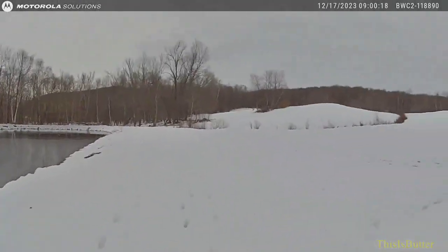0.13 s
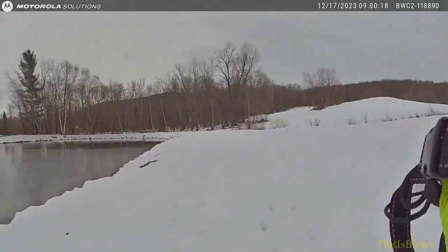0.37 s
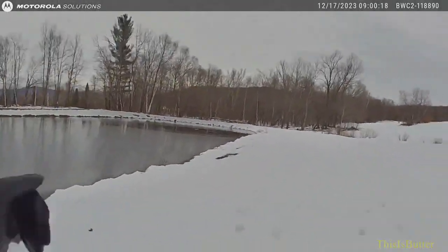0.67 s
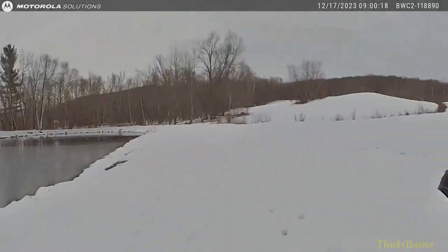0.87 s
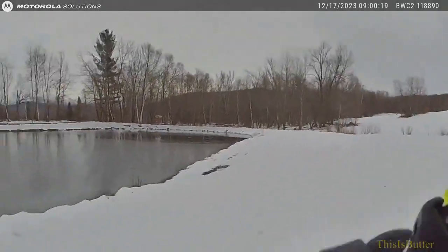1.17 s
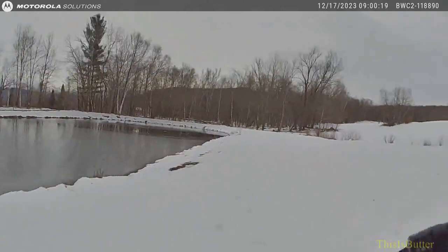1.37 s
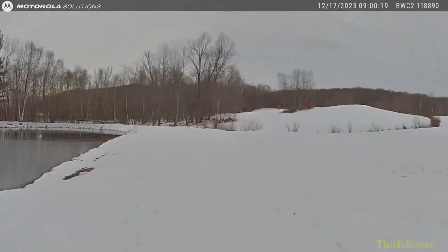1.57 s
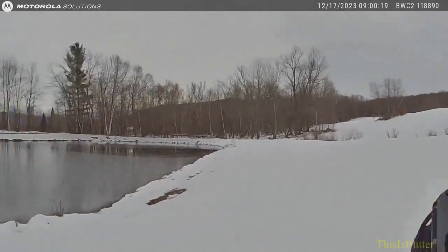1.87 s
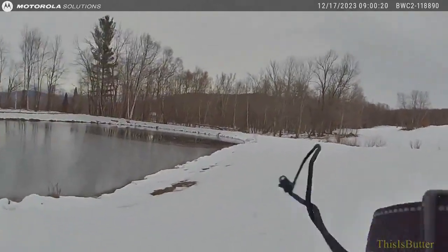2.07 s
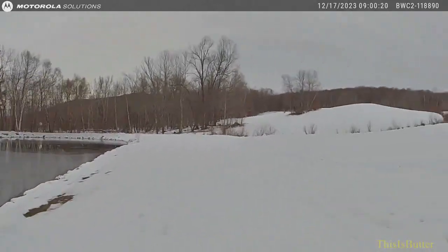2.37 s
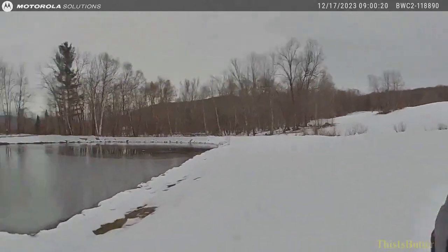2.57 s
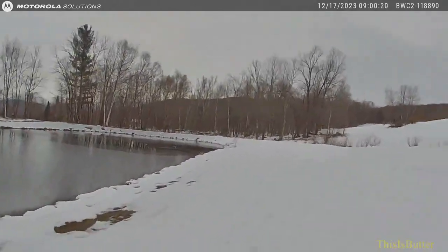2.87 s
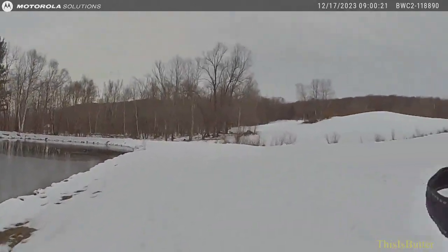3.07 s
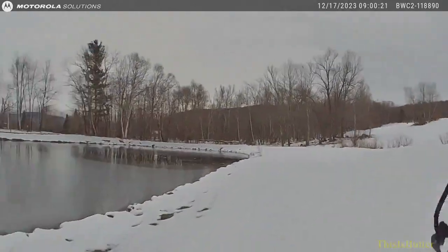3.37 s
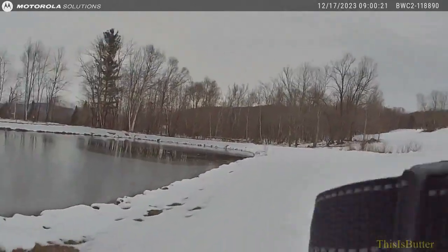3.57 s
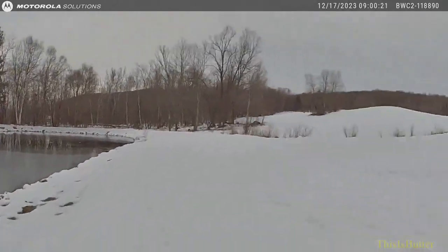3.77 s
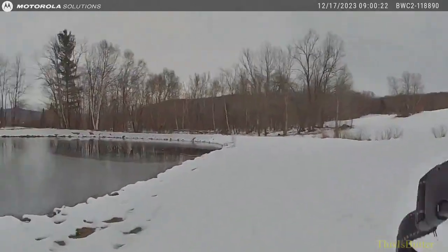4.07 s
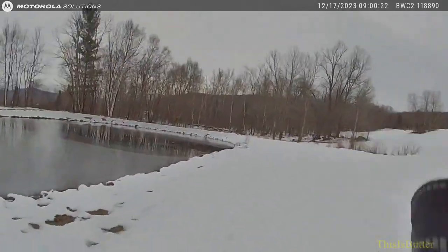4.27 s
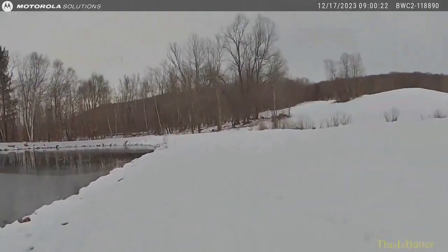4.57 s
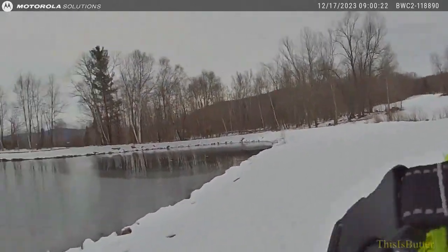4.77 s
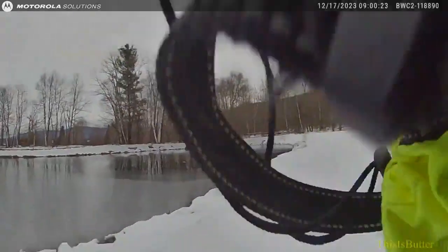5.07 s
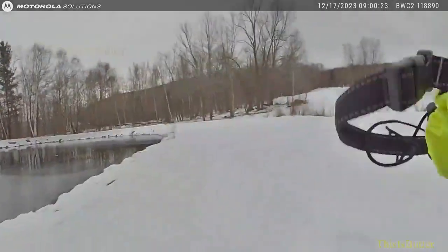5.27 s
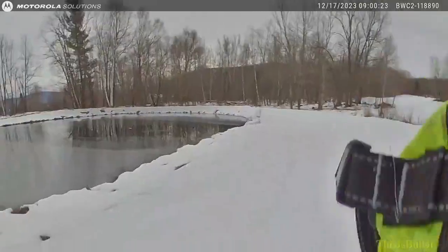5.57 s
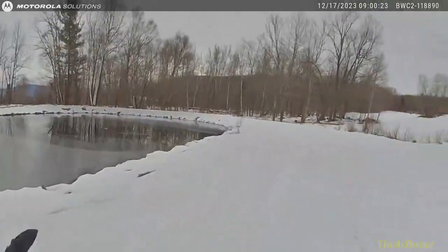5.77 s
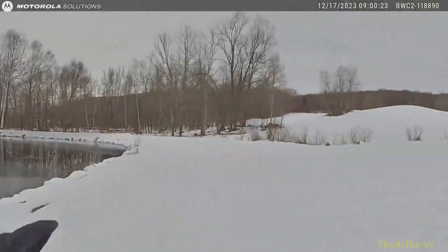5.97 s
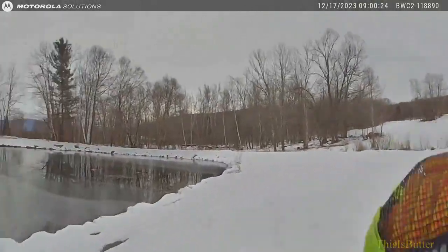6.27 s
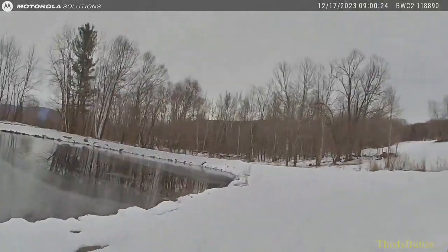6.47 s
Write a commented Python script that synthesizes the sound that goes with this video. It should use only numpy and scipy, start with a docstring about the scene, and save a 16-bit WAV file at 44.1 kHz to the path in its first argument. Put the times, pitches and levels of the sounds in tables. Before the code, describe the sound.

Rapid boot crunches continue from start to end, mixed with louder handling noise: crisp cloth rubs, hollow fabric pops, short buckle and strap scrapes, and dull knocks on the microphone. Brief low gusts push at it with the body's swing. The place is open and snowy with no echo; a constant hiss and wavering high whine lie underneath, and peaks sound squashed.

```python
"""Stiff cloth swishes and pops over crunching snow: someone runs with a small recorder worn on the chest.
Boots break snow grains that ring its hollows, near three steps a second; sleeves rub as many tiny clicks;
folds of the jacket buckle as short decaying tones; straps scrape the housing in bursts of snaps and rasp.
The housing bumps as damped low tones and gusts buffet the ports as low rounded noise.
All is close and dry over a steady hiss with a thin whine; a limiter holds the peaks down."""
import sys
import numpy as np
from scipy import signal
from scipy.fft import rfft, irfft
from scipy.io import wavfile
from scipy.ndimage import uniform_filter1d, minimum_filter1d

SR = 44100
rng = np.random.default_rng(int(sys.argv[2]) if len(sys.argv) > 2 else 0)


def bounce(signal):
    """Save signal as a 16-bit WAV file at the path given by the first command-line argument."""
    frames = np.transpose(np.atleast_2d(signal))
    limited = np.clip(frames, -1, 1)
    pcm = np.round(limited * 32767).astype(np.int16)
    wavfile.write(sys.argv[1], SR, pcm)


N = 292383
TIME = np.arange(N) / SR  # s
TREBLE_SIDE_DB = -7  # opposed part of the bright sounds, relative to the shared part

# quick slips of cloth on cloth: (t/s, level/dB, length/s)
CLOTH_SLIPS = [(0.134, -23, 0.03), (0.249, -20, 0.004), (0.258, -20, .008), (0.34, -20.5, 0.0068),
               (0.401, -26, 0.0037), (0.464, -13, 0.0023), (0.921, -17, 0.0044), (1.091, -11, 0.0036),
               (1.266, -15, 0.006), (1.289, -6, 0.0069), (1.45, -18, 0.0033), (1.562, -7, 0.012),
               (1.919, -11, 0.0053), (1.941, -19.5, 0.0092), (2.003, -14.5, 0.0052), (2.112, -23, 0.0047),
               (2.235, -16.5, 0.025), (2.443, -18, 0.013), (2.303, -18.5, 0.023), (2.572, -16, 0.0037),
               (2.598, -11.5, 0.011), (2.686, -6, 0.0026), (3.052, -15.5, 0.0053), (3.335, -18, 0.013),
               (3.794, -21, 0.0043), (3.868, -14, 0.004), (3.88, -13, 0.0025), (4.02, -30, 0.012),
               (4.076, -16, 0.0054), (4.26, -17.5, 0.0045), (4.587, -17, 0.0054), (4.642, -16, 0.0074),
               (4.673, -21, 0.0031), (4.697, -23, 0.0035), (4.789, -10, 0.0086), (4.849, -25, 0.007),
               (5.149, -13, 0.02), (5.527, -13, 0.011), (5.66, -13, 0.0047), (5.943, -21.5, 0.022),
               (6.235, -14.5, 0.01), (6.249, -26.5, 0.0038), (6.535, -12, 0.0045)]
# spectrum of rubbed cloth: (f/Hz, relative level/dB)
CLOTH_SPECTRUM = [(2000, -5.5), (4500, -4.5), (6500, -1), (7800, 4), (8600, 2), (9500, 6), (10200, 5),
                  (11500, 3.5), (12200, 1), (13000, -5.5)]


def undb(db):
    """Amplitude ratio from decibels: twenty decibels is a factor of ten."""
    return np.exp(np.asarray(db) * np.log(10) / 20)


def unit(x):
    """Normalisation by signal power: scale to rms 1."""
    return x / np.sqrt(np.mean(x ** 2))


def colour(x, spectrum):
    """Minimum-phase filtering: folding the cepstrum of the log gain makes the filter causal; rms 1."""
    hz, db = np.transpose(spectrum)
    size = 2048
    grid = np.maximum(np.fft.rfftfreq(size, 1 / SR), 1)
    gain_db = np.interp(np.log(grid), np.log(hz), db)
    cepstrum = irfft(np.log(undb(gain_db)))
    cepstrum[1:size // 2] *= 2
    cepstrum[size // 2 + 1:] = 0
    impulse = irfft(np.exp(rfft(cepstrum)))
    return unit(signal.oaconvolve(x, impulse[None], axes=1)[:, :N])


def resonate(x, hz, q):
    """Resonance: a second-order band-pass with gain 1 at its centre."""
    b, a = signal.iirpeak(min(hz, SR / 3), max(q, .4), SR)
    return signal.lfilter(b, a, x)


def walk(rate):
    """Random modulation: independent levels, rate of them a second, joined by straight lines; spread 1."""
    levels = rng.standard_normal(int(N / SR * rate) + 2)
    return np.sqrt(3 / 2) * np.interp(TIME * rate, np.arange(len(levels)), levels)


def ports(pair, side_db, pan_db=0):
    """Mid-side stereo: left and right share one part and carry a second in opposite phase."""
    side = undb(side_db) * pair[1]
    left = (pair[0] + side) * undb(pan_db / 2)
    right = (pair[0] - side) * undb(-pan_db / 2)
    return np.array([left, right])


def grains(rate, spread_db):
    """Shot noise: clicks of either sign at random moments, a few larger than the rest."""
    chance, out = rng.random((2, N)), np.zeros((2, N))
    share = chance * SR / rate
    happens = share < 1
    # within each click, the share left over is a fresh random number that sets its size
    sizes = undb(spread_db * np.minimum(-np.log(share[happens] + 1e-12), 4))
    signs = np.where(rng.random((2, N)) < .5, -1, 1)
    out[happens] = sizes * signs[happens]
    return out


def add(track, start, sound):
    """Superposition: mix a short sound into a track at a time in seconds."""
    first = max(int(start * SR), 0)
    track[:, first:first + sound.shape[1]] += sound[:, :N - first]


def patchy(x, centres, q, depth_db, rate):
    """Load sharing: resonances of the contact spots swell and fade on their own at a fixed summed power gain."""
    shares = undb(depth_db * np.array([walk(rate) for hz in centres]))
    shares = shares / np.sqrt(np.sum(shares ** 2, axis=0))
    return unit(sum(resonate(x, hz, q) * share for hz, share in zip(centres, shares)))


def effort(moves, attack, release, rest_db):
    """Power addition: movements of (t/s, length/s, level/dB, growth/dB) take hold, grow and let go; result in dB."""
    power = np.full(N, undb(rest_db) ** 2)
    for start, length, db, growth_db in moves:
        age = TIME - start
        grip = np.clip(age / attack, 0, 1) * np.exp(-np.clip((age - length) / release, 0, 20))
        progress = np.clip(age / length, 0, 1)
        power += (grip * undb(db + growth_db * (progress - 1))) ** 2
    return 10 * np.log10(power)


def stroke(length, release):
    """Dry friction: the force grips within half a millisecond, holds, and decays exponentially."""
    grip = .0004  # s
    t = TIME[:SR // 10]
    return np.minimum(t / grip, 1) * np.exp(-np.maximum(t - abs(length), 0) / release)


def pop(hz, cycles, tick_db=-13, upper_db=-13, sag=0.22):
    """Snap-through buckling: a tick, then a decaying panel mode that sags in pitch, with a weaker upper mode."""
    tick_decay = .0025  # s
    t = TIME[:SR // 40]
    fade = np.exp(-np.log(1000) * t * hz / max(cycles, 3))  # 60 dB down after this many cycles of hz
    swell = (1 - np.exp(-t * hz / .8)) ** 2 * fade
    phase = 2 * np.pi * (0.934 * hz * t + sag * (1 - np.exp(-t * hz)))
    turn, upper_turn = rng.uniform(0, 2 * np.pi, 2)
    ring = np.sin(phase + turn)
    ring = ring + undb(upper_db) * np.sin(phase * rng.uniform(1.63, 2.34) + upper_turn)
    tick = undb(tick_db) * rng.standard_normal((2, len(t))) * np.exp(-t / tick_decay)
    panel = np.outer([1, rng.normal()], ring * swell / swell.max())
    return ports(tick, TREBLE_SIDE_DB) + ports(panel, -12, 1.5)


def hiss(hiss_db=-41, whine_hz=7050, whine_db=-45, waver_db=10.0):
    """Stationary noise: a steady coloured hiss, with a narrow-band resonance heard as a wavering whine."""
    # spectrum of the hiss: (f/Hz, relative level/dB)
    hiss_spectrum = [(40, -17), (200, 7), (800, 36.5), (2700, 30.5), (4500, 23.5), (6500, -17), (8000, -31),
                     (11500, -12), (13000, -10)]
    whine = unit(resonate(rng.standard_normal(N), whine_hz, 140) * undb(waver_db * walk(11)))
    noise = undb(hiss_db) * colour(rng.standard_normal((2, N)), hiss_spectrum)
    return ports(noise, TREBLE_SIDE_DB) + undb(whine_db) * whine


def wind(push_db, eddy_db=2):
    """Turbulent pressure: low noise with rounded swings thumps on the ports as the chest or a footfall stirs air."""
    # a swing of the chest drives air hard across the ports: (t/s, length/s, level/dB)
    chest_gusts = [(0.266, 0.11, -28), (0.49, 0.16, -36), (0.717, 0.075, -28), (0.98, 0.18, -38),
                   (1.198, 0.15, -35.5), (1.739, 0.12, -23), (1.89, 0.13, -41), (2.486, 0.083, -23.5),
                   (2.86, 0.12, -30), (4.314, 0.12, -29.5), (5.029, 0.075, -21.5), (6.051, 0.2, -32),
                   (6.32, 0.06, -34.5)]
    # spectrum of the eddies before rounding: (f/Hz, relative level/dB)
    eddy_spectrum = [(20, -22), (50, 4.5), (110, 1.5), (200, -0.5), (330, -8.5), (480, -10), (900, -31),
                     (3000, -96)]
    attack, release, swell_db, rest_db = 0.036, 0.035, 4.5, -52.5  # s, s, dB, dB
    stride_air_db = -15  # relative to the crunch of the footfall
    rounded = np.tanh(colour(rng.standard_normal((2, N)), eddy_spectrum))
    eddies = colour(rounded, [(40, -1), (120, 5.5), (400, 8), (620, 3), (1200, -39)])
    eddies = ports(eddies, -7, 1.2)
    gust_db = effort([(*gust, swell_db) for gust in chest_gusts], attack, release, rest_db)
    flow = np.hypot(undb(gust_db), undb(push_db + stride_air_db))
    return eddies * flow * undb(eddy_db * walk(45))


def bumps(overtone_db=-10, onset_share=0.1):
    """Damped impact: a tap on padding is gone within a cycle, a heavy thud rolls on for several."""
    # the housing bumping against the chest: (t/s, level/dB, f/Hz, decay time constant/s)
    chest_bumps = [(0.014, -11.5, 168, 0.0019), (0.048, -10, 121, 0.0034), (0.326, -18, 186, 0.015),
                   (.37, -27, 140, 0.0061), (0.535, -18, 133, 0.0046), (0.568, -16.5, 149.6, 0.0098),
                   (0.763, -31, 131, 0.0072), (1.343, -11, 193, 0.0053), (1.534, -17, 263, 0.004),
                   (1.714, -20, 158, 0.0061), (1.762, -13, 132, 0.014), (1.794, -8, 138, 0.0086),
                   (1.812, -9.5, 126, 0.014), (1.828, -14.5, 236, 0.021), (1.859, -6.5, 146, 0.0081),
                   (1.975, -22, 127, 0.011), (2.069, -5, 121.9, 0.0016), (2.393, -22, 123.5, 0.023),
                   (2.53, -35, 123.3, 0.0066), (2.556, -12, 137, 0.0052), (2.571, -9, 177, 0.01),
                   (2.812, -23, 160.6, 0.0028), (3.023, -17, 143, 0.0025), (4.358, -18, 148.3, 0.012),
                   (4.431, -27, 150, 0.0069), (4.794, -5, 139.5, 0.001), (5.052, -17, 134, 0.0099),
                   (5.101, -9, 157.5, 0.0088), (5.656, -17, 162.3, 0.0027), (6.137, -16, 125, 0.014),
                   (6.16, -24, 167, .012), (6.254, -20, 183, 0.012), (6.276, -16, 194, 0.0049),
                   (6.333, -20.5, 233, 0.0077), (6.347, -16, 138, 0.0058), (6.462, -12, 179.6, 0.0022)]
    out, t = np.zeros((2, N)), TIME[:SR // 8]
    for start, db, hz, decay in chest_bumps:
        overtone_hz = hz * rng.uniform(1.24, 2.21)
        thud = np.sin(2 * np.pi * hz * t) + undb(overtone_db) * np.sin(2 * np.pi * overtone_hz * t)
        thud = thud * (1 - np.exp(-t / (onset_share * decay)))
        add(out, start, undb(db) * (thud * np.exp(-t / decay))[None])
    return out


def scrapes(level_db=1.0, rasp_db=-4.5, knock_db=-7, release=0.0022):
    """Stick-slip: webbing catches on the housing in a quick run of snaps, with a rasp and a dull knock."""
    # straps and buckles scraping the housing: (t/s, relative level/dB, reference f/Hz, length/s)
    strap_scrapes = [(0.047, -11.5, 3060, 0.0058), (0.08, -15, 3000, 0.0023), (0.339, -22, 3220, 0.0069),
                     (0.426, -15.5, 3520, 0.0057), (0.565, -24, 3070, 0.0037), (0.61, -25, 3300, 0.0059),
                     (0.627, -12, 2880, 0.0035), (0.632, -15, 3250, 0.0094), (.752, -16.5, 3000, 0.0032),
                     (1.056, -31, 4600, 0.0024), (1.135, -18.5, 3240, 0.0047), (1.197, -32, 2800, 0.0036),
                     (1.292, -8, 3970, 0.0045), (1.34, -12, 3000, 0.0073), (1.497, -13, 2900, 0.0035),
                     (1.57, -20, 3300, 0.0042), (1.657, -23, 2800, 0.0037), (1.697, -20.5, 3000, 0.0056),
                     (1.776, -22, 3040, 0.0037), (1.96, -25, 3500, 0.0024), (2.054, -26, 3720, 0.0028),
                     (2.065, -11, 3090, 0.0043), (2.106, -20, 3230, 0.0024), (2.203, -17, 2710, 0.0023),
                     (2.381, -35, 3150, 0.0026), (2.6, -12, 3350, 0.0026), (2.639, -35, 4600, 0.0054),
                     (2.666, -25, 3400, .002), (2.696, -26, 4900, 0.0029), (2.807, -11.5, 2404, 0.0068),
                     (2.958, -13, 2680, 0.0073), (3.023, -16, 2826, 0.0049), (3.147, -18.5, 2120, 0.0021),
                     (3.339, -16, 3750, 0.008), (3.531, -24, 2910, 0.002), (3.675, -9, 2550, 0.0018),
                     (3.707, -14, 2890, 0.0055), (3.865, -23, 3820, .004), (4.07, -20, 4170, 0.0082),
                     (4.131, -26, 3040, 0.0029), (4.22, -26.5, 2200, 0.0022), (4.25, -22, 3570, 0.024),
                     (4.445, -14, 3610, 0.0062), (4.497, -14, 3000, 0.0037), (4.791, -16, 3730, 0.0086),
                     (4.941, -23, 3900, 0.0039), (5.094, -19, 3000, 0.0029), (5.106, -15, 3214, 0.0028),
                     (5.145, -18, 3160, 0.0069), (5.159, -15, 4670, 0.0094), (5.279, -21, 4660, 0.0014),
                     (5.315, -23, 3030, 0.0092), (5.352, -25, 3600, 0.002), (5.52, -19, 4600, 0.0026),
                     (5.546, -18.5, 2600, 0.0018), (5.653, -17, 3240, 0.003), (5.675, -17.5, 4200, 0.0039),
                     (5.691, -19, 4500, 0.0024), (6.097, -20, 2560, 0.0058), (6.239, -25, 4250, 0.0049),
                     (6.298, -21, 5200, 0.0027), (6.451, -13.5, 2985, 0.0028), (6.464, -12.5, 4334, 0.0015),
                     (6.512, -18.5, 3220, 0.0017)]
    out = np.zeros((2, N))
    for start, db, hz, length in strap_scrapes:
        force = stroke(length, release)
        teeth = rng.standard_normal((2, len(force)))
        rasp = undb(rasp_db) * unit(resonate(teeth, 1.46 * hz, 0.39))
        knock = undb(knock_db) * unit(resonate(teeth, 530, 0.36))
        add(out, start, undb(db + level_db) * force * ports(rasp + knock, TREBLE_SIDE_DB))
        # the snaps tend to rise in pitch as the strap tightens
        for order, (late, detune) in enumerate(rng.random((5, 2))):
            delay = 0.0013 * order * (1 + 0.28 * late)
            if delay < length:
                snap = pop(0.75 * hz * (1 + 35 * delay) * 2 ** (detune - .5), 4.2)
                add(out, start + delay, undb(db + level_db + 1.5) * snap)
    return out


def folds(level_db=-2.5, panel_db=-10):
    """Buckling: stiff folds pop as the body twists and excite the panel around them, most after a hard pop."""
    # folds of the jacket buckling: (t/s, relative level/dB, nominal f/Hz, ring length/cycles)
    fold_pops = [(0.023, -5.5, 1480, 16), (.059, -14, 1178, 5.5), (.097, -8, 1100, 5.4),
                 (.164, 1.5, 1140, 11), (.223, -18, 970, 4.1), (.416, -16, 910, 8.6), (.704, -22, 780, 7),
                 (.752, -9, 1150, 7.1), (0.769, -8.5, 780, 4.7), (0.823, -9, 1050, 6.9),
                 (.868, -21, 1000, 8), (0.922, -12, 1200, 6.7), (1.117, -10, 686, 5),
                 (1.139, -11, 750, 5.6), (1.1517, 0.5, 776, 8.6), (1.268, -3, 900, 6.1),
                 (1.472, -5.5, 1510, 18), (1.5, -12, 1210, 6.8), (1.509, -9, 1025, 8), (1.536, -16, 560, 5),
                 (1.55, -15, 880, 11), (1.624, -5.5, 1490, 2.4), (1.644, -13, 940, 7.9),
                 (1.697, -15, 705, 10), (1.782, -7.5, 840, 6), (1.847, -14, 850, 8.1),
                 (1.87, -8.5, 830, 10), (1.997, -11, 1750, 9.4), (1.998, -18, 769, 6), (2.204, -6, 1280, 9),
                 (2.244, -13, 1155, 7.3), (2.284, -15, 830, 5.3), (2.321, -10, 2040, 20),
                 (2.45, -12.5, 770, 9.1), (2.601, -5.5, 770, 9.9), (2.624, -15, 770, 9.1),
                 (2.783, -8, 1830, 24), (2.806, -10, 1490, 11.6), (2.936, -7.5, 1420, 24),
                 (2.975, -11, 1290, 8.2), (3.157, -9, 1600, 13), (3.192, -7.5, 690, 10.4),
                 (3.254, -2, 1403, 8), (3.267, -10, 1490, 7.7), (3.329, -14, 760, 6.2),
                 (3.427, -17, 1660, 7), (3.518, -7, 1620, 8.2), (3.676, -10, 1465, 14.4),
                 (3.796, -19, 1110, 7.2), (4.072, -13, 920, 17.4), (4.209, -5, 1184, 3.5),
                 (4.2197, 0.5, 924, 6.4), (4.417, -4, 1380, 6.9), (4.446, -13, 975, 23),
                 (4.507, -6, 810, 5.5), (4.529, -13, 931, 8.3), (4.572, -19, 833, 5.5),
                 (4.643, -13, 700, 3.3), (4.761, -13.5, 544, 11), (4.7807, -1, 840, 7.1),
                 (4.856, -14, 2600, 19), (4.903, -2.5, 937, 9.2), (4.922, -10.5, 1730, 12),
                 (4.994, -13, 1020, 7.6), (5.024, -12, 1000, 8.8), (5.23, -18, 829, 7.4),
                 (5.454, -16, 704, 4.4), (5.486, -15, 1083, 3.4), (5.645, -13, 1216, 6.9),
                 (5.833, -5, 1506, 18), (5.867, -9, 990, 6), (5.872, -8, 790, 4.5), (5.911, -7, 1430, 9),
                 (6.079, -18, 842, 5.5), (6.091, -15, 665, 10.3), (6.226, -14, 825, 7.4),
                 (6.231, -13, 504, 6.4), (6.237, -8, 815, 2.8), (6.4, -15, 980, 6.5),
                 (6.537, -10.5, 1483, 9.4), (6.599, -3, 840, 5.5)]
    out = np.zeros((2, N))
    for start, db, hz, cycles in fold_pops:
        add(out, start, undb(db + level_db) * pop(hz, cycles))
        add(out, start + 0.0028, undb(1.2 * db + panel_db) * pop(776, 7.3))
    return out


def slips(release=0.0018):
    """Stick-slip release: cloth that has stuck shoots forward with a short bright swish."""
    force = np.zeros((1, N))
    for start, db, length in CLOTH_SLIPS:
        add(force, start, undb(db) * stroke(length, release)[None])
    return force * ports(colour(rng.standard_normal((2, N)), CLOTH_SPECTRUM), TREBLE_SIDE_DB)


def sticking(hold=0.019, grip_db=-4):
    """Static friction: just before each slip the cloth grips and its swish is held down."""
    moving = np.ones(N)
    for start, db, length in CLOTH_SLIPS:
        first, last = max(int((start - abs(hold)) * SR), 0), int(start * SR)
        moving[first:last] = undb(grip_db)
    return uniform_filter1d(moving, size=128)


def sweeping(lean):
    """Tension dependence: level in dB of the sweeps, for cloth that gains (lean 1) or loses (lean -1) by it."""
    # a sleeve sweeps over the jacket: (t/s, length/s, level/dB, tension as taut over slack level/dB)
    sleeve_sweeps = [(0.001, 0.16, -19.5, -2), (0.184, 0.07, -20, 10), (0.301, 0.2, -19, 3.5),
                     (0.572, 0.11, -22, -5), (0.659, 0.13, -28.5, -7), (0.75, 0.17, -19, -4.5),
                     (0.932, 0.16, -16, 4.5), (1.109, 0.13, -21.5, 2), (1.236, 0.065, -21, -6),
                     (1.376, 0.2, -17, 1.5), (1.619, 0.099, -30.5, 18), (1.711, 0.087, -16.5, 4),
                     (1.84, 0.073, -16.5, -2), (1.96, 0.08, -27, 11), (2.094, 0.24, -21.5, 4),
                     (2.283, 0.12, -25, 1), (2.407, 0.077, -18, -2.5), (2.527, 0.11, -20, 7),
                     (2.646, 0.088, -24.5, -1), (2.78, 0.2, -21, 9.5), (2.946, 0.21, -21, 0.5),
                     (3.164, 0.18, -16.5, 3.5), (3.388, 0.022, -23, 18), (3.535, 0.19, -23, -4),
                     (3.783, 0.094, -21, 6), (3.899, 0.15, -21.5, 14), (3.996, 0.15, -25, -2),
                     (4.229, 0.018, -13.5, 10), (4.332, 0.24, -20, 4), (4.611, 0.083, -17.5, -5.5),
                     (4.686, 0.17, -21, -3), (4.883, 0.048, -19.5, 0), (4.96, 0.1, -21.5, -5),
                     (5.11, 0.018, -24, -12), (5.195, 0.055, -29, 11), (5.3, 0.03, -14, 8),
                     (5.369, 0.13, -22, 7), (5.476, 0.21, -32, -16), (5.698, 0.28, -20, -4),
                     (5.923, 0.35, -25, 9), (6.057, 0.096, -19, 4), (6.2, 0.11, -25, -6.5),
                     (6.37, 0.052, -33.5, -11), (6.469, 0.22, -26, -13.5)]
    attack, release, swell_db, rest_db = 0.025, 0.021, 2.5, -29  # s, s, dB, dB
    moves = [(start, length, db + lean * tension / 2, swell_db)
             for start, length, db, tension in sleeve_sweeps]
    return effort(moves, attack, release, rest_db)


def sleeves(level_db=0.5, judder_db=1.5, catch_db=2.0, crease_db=16.0, thread_rate=16000,
            drag_db=1.68, thread_db=9.5):
    """Friction noise: threads catch and let go by the thousand; taut cloth sings higher than slack."""
    threads = grains(thread_rate, 1.6)
    creases = patchy(threads, np.linspace(7500, 10100, num=7), 26, crease_db, 24)
    slack = unit(undb(thread_db) * unit(threads) + creases) * 2.0
    taut = patchy(threads, np.linspace(10900, 12100, num=5), 28, crease_db, 24)
    slack_db, taut_db = sweeping(-1), sweeping(1)
    tension_db = taut_db - slack_db
    slack = slack * undb(catch_db * walk(390) - tension_db / 2)
    taut = taut * undb(catch_db * walk(360) + tension_db / 2)
    swish = ports(colour(slack + taut, CLOTH_SPECTRUM), TREBLE_SIDE_DB)
    sweep_db = (slack_db + taut_db) / 2 + level_db
    return swish * undb(sweep_db + judder_db * walk(110) + drag_db * walk(22))


def treading(icy):
    """Loading: level in dB of the crunches as weight comes on, for their body (icy 0) or bright edge (icy 1)."""
    # a boot loads the snow, landing or pushing off:
    # (t/s, length/s, level/dB, growth as the weight comes on/dB, brightness/dB)
    boot_crunches = [(0.0, 0.17, -28, -2.5, 1), (0.167, .06, -34, -2, 0.5), (0.316, .22, -33, 0, 2),
                     (0.565, .085, -27, 4.5, 4), (0.681, .23, -23.5, 3.5, 0), (0.923, .136, -29, -2, -1),
                     (1.106, .11, -27, -2, 3.5), (1.283, .06, -28, 0, 8), (1.359, .205, -22, 6.5, -1),
                     (1.619, .29, -28, 6, -2), (1.923, 0.15, -32.5, 0, 5.5), (2.107, .21, -24, 0, 2),
                     (2.346, .11, -23.5, 7, 3.5), (2.493, .16, -27, 2, 0), (2.735, .08, -24.5, 6, -1),
                     (2.862, .125, -21.5, 2, 3.5), (2.995, .1, -28, -4, -2), (3.155, .13, -25, 1.5, 3),
                     (3.3, .12, -36, -4, -8), (3.501, .23, -21.5, 2.5, 0), (3.745, .138, -30, 0.5, 1.5),
                     (3.915, .09, -34, 0, 5.5), (4.066, .14, -31, -3, 4), (4.28, .165, -21.5, 4, 3),
                     (4.473, .055, -23.5, 1.5, -2), (4.631, .17, -26, 7, -0.5), (4.824, .04, -31, 0, 9),
                     (4.905, .06, -28, -2.5, 1.5), (4.981, .175, -24.5, 1, 0), (5.2, .21, -35, -0.5, -0.5),
                     (5.423, .11, -26, 2.5, -2.5), (5.539, .11, -32.5, -3, -3), (5.699, .21, -22, 0, 0),
                     (5.904, .06, -29, -3, 3.5), (5.971, .09, -37.5, -0.5, 1), (6.066, .05, -29, -2, 8.5),
                     (6.17, .1, -31.5, 2, -10.5), (6.385, .05, -33, 3.5, 4), (6.428, .21, -20, 9, 1.5)]
    attack, release, rest_db = .028, .017, -50  # s, s, dB
    moves = [(start, length, db + icy * bright, growth)
             for start, length, db, growth, bright in boot_crunches]
    return effort(moves, attack, release, rest_db)


def collapses(rate=85, settle=0.0067, spread_db=1.0, steady_db=2.0):
    """Intermittent yielding: the boot sinks in jerks that die within milliseconds, over a steady creep."""
    impulses = np.abs(grains(rate, spread_db)[0])
    jerks = signal.lfilter([1], [1, -np.exp(-1 / (settle * SR))], impulses)
    return unit(np.hypot(unit(jerks), undb(steady_db)))


def cracks(push_db, level_db=2, scatter_db=5, ring_cycles=6, count=300):
    """Brittle fracture: lumps of crust break mostly under the hardest press; small, high ones tend to be fainter."""
    low_hz, range_oct, fall_db_per_oct = 640, 2.56, 0.7
    out = np.zeros((2, N))
    work = np.cumsum(undb(push_db))
    for order, (when, pitch, size) in enumerate(rng.random((count, 3))):
        at = np.searchsorted(work, (order + when) / count * work[-1])  # equal work between cracks, on average
        octaves = range_oct * pitch
        db = push_db[at] + level_db + scatter_db * (2 * size - 1)
        db += fall_db_per_oct * (range_oct - octaves)
        lump = pop(low_hz * 2 ** octaves, ring_cycles * (1 + pitch), tick_db=-18)
        add(out, at / SR, undb(db) * lump)
    return out


def snow(push_db, crush_db=-0.27, ice_db=-5, uneven_db=0.95, density=700, spread_db=0.15,
         powder_db=-5, crystal_rate=1500):
    """Granular collapse: breaking grains, more under a harder push, ring hollows; ice spray adds a bright edge."""
    # spectra of the crushed snow and of the ice crystals: (f/Hz, relative level/dB)
    snow_spectrum = [(90, -38), (250, 5), (450, 0), (720, 2.5), (1100, -1.5), (1500, 2), (2200, -2),
                     (2700, -3), (3500, -8), (6000, -23)]
    ice_spectrum = [(1800, -35), (2800, -2), (4200, -5.5), (5500, -2.5), (6800, -7.5), (9000, -8),
                    (13000, -23)]
    load = undb(push_db + 29.5)
    # dividing by the root of the load evens out the power of the denser grains
    breaks = unit(grains(density * load, spread_db) * collapses() / np.sqrt(load))
    hollows = patchy(breaks, np.geomspace(420, 2800, num=15), 12, 7, 50)
    crush = unit(colour(hollows, snow_spectrum) + undb(powder_db) * colour(breaks, snow_spectrum))
    crush = crush * undb(uneven_db * walk(130))
    spray = grains(crystal_rate * load, spread_db) / np.sqrt(load)
    crystals = patchy(spray, np.geomspace(2400, 7000, num=16), 20, 6, 50)
    edge_db = treading(1) - push_db
    ice = colour(crystals, ice_spectrum) * undb(edge_db + uneven_db * walk(170))
    body = undb(crush_db) * ports(crush, -9.5, 1.5)
    edge = undb(ice_db) * ports(ice, TREBLE_SIDE_DB)
    return undb(push_db) * (body + edge)


def scene():
    """Direct sound only: everything sounds within reach of the chest; snow gives no echo."""
    push_db = treading(0)
    boots = snow(push_db) + cracks(push_db)
    jacket = sleeves() * sticking() + slips() + folds()
    return boots + jacket + scrapes() + bumps() + wind(push_db) + hiss()


def record(dry, ceiling=.68, top_hz=12800):
    """Peak limiting: a fast gain reduction holds the peaks, then a low-pass cuts the top."""
    lowpass = signal.ellip(10, .2, 70, top_hz, fs=SR, output="sos")
    room = ceiling / np.maximum(np.abs(dry).max(axis=0), ceiling)
    gain = uniform_filter1d(minimum_filter1d(room, size=41), size=41)  # about 1 ms around each peak
    return signal.sosfilt(lowpass, dry * gain)


dry = scene()
out = record(dry)
bounce(out)
```